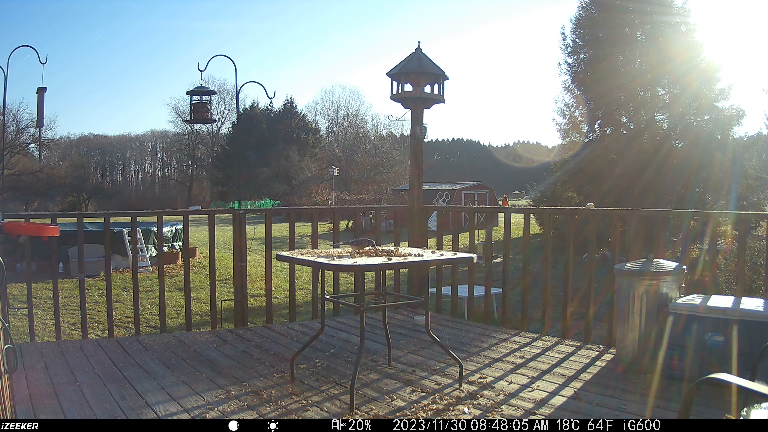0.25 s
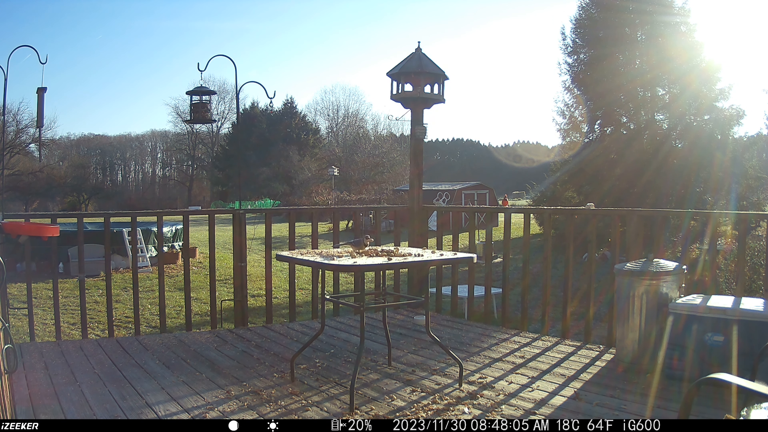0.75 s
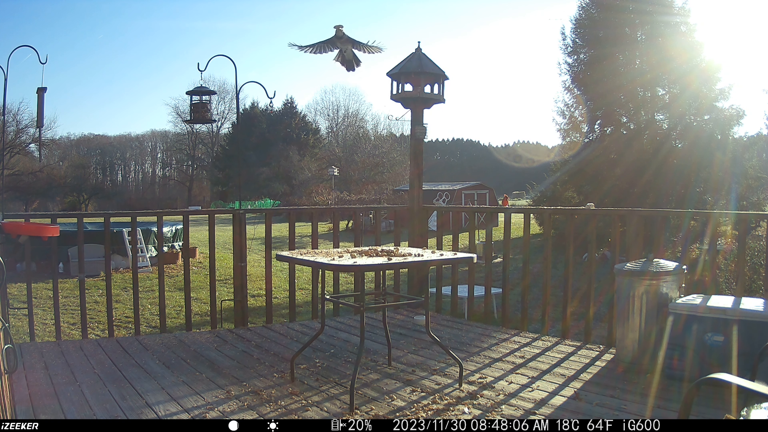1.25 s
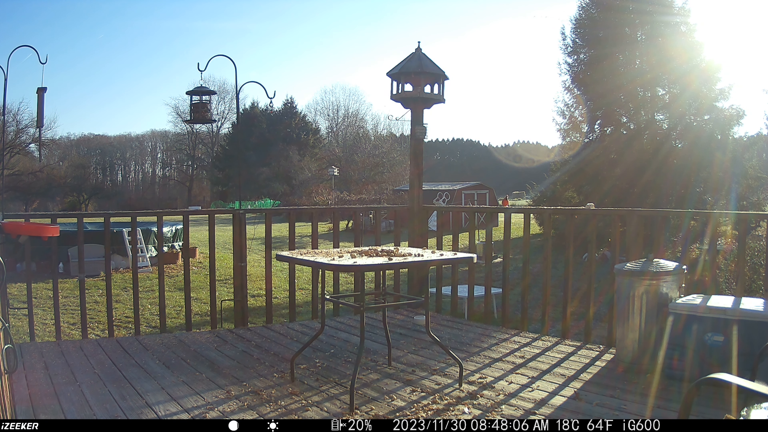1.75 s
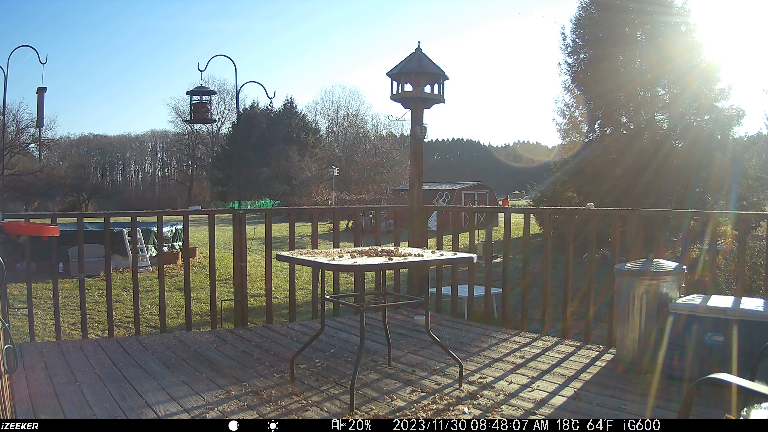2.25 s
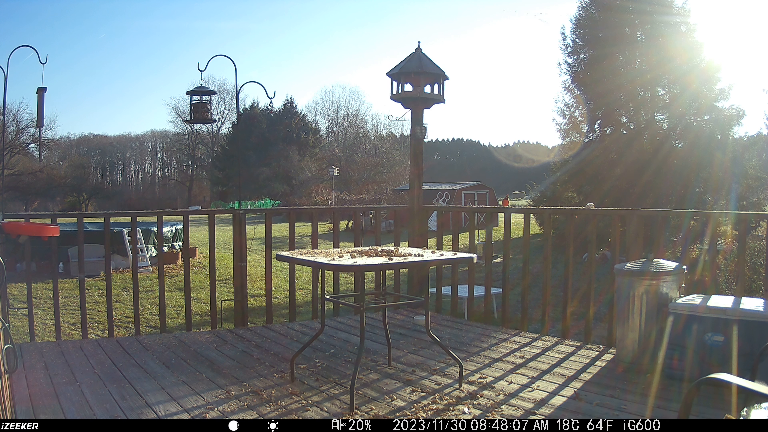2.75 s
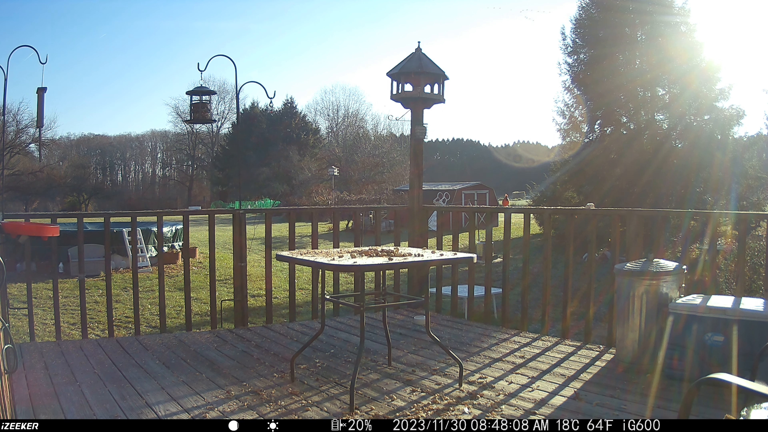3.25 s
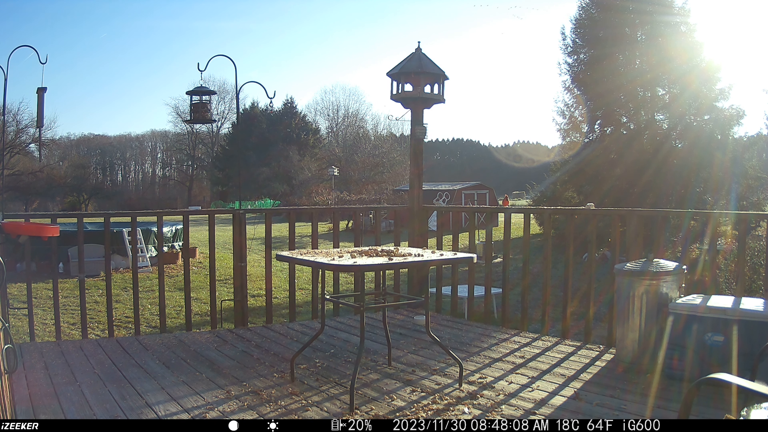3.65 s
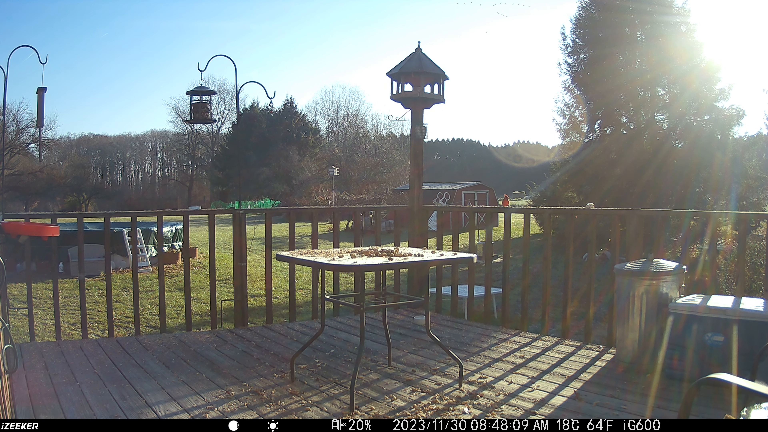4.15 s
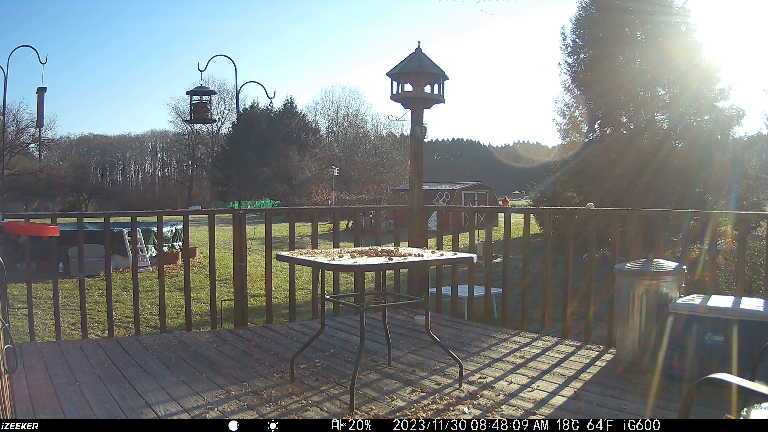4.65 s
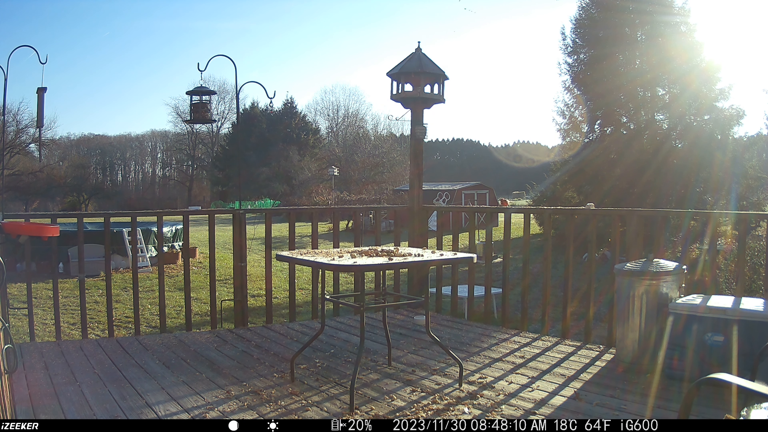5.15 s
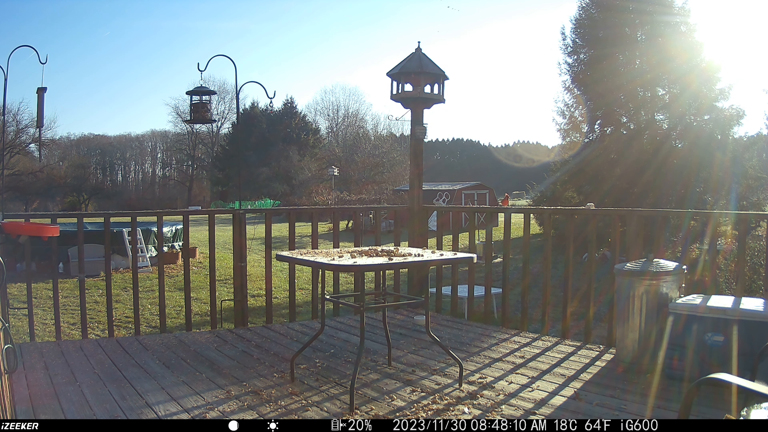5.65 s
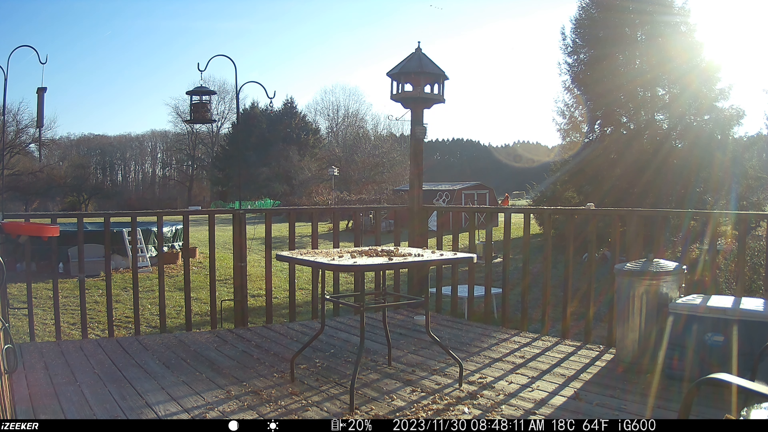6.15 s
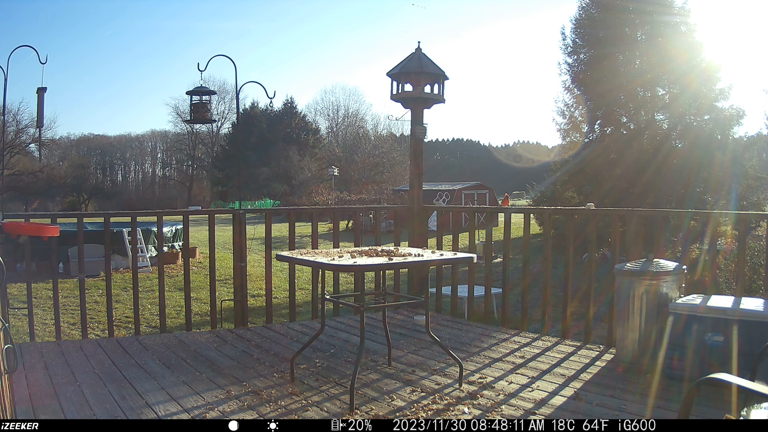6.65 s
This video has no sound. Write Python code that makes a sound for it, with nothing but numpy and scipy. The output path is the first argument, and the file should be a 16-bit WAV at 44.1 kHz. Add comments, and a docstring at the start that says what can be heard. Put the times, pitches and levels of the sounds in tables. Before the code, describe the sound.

Geese gabble faintly in the distance over quiet outdoor rumble, then a blue jay close by screams twice, loud, harsh and hoarse.

```python
"""Garden deck beside a house, trees beyond: a blue jay screams twice close to the microphone.
Each scream leaps up, sags and turns hoarse, built from partials, half-pitch lines and breath noise.
Farther off, a jay answers from the trees in partials and a flock of geese honks in reedy notes.
A small bird chips twice in two gliding tones; seed ticks and wingbeats at the feeders are shaped noise.
Wall and trees echo; the camera's noise suppressor lets the quiet outdoor rumble swell behind each scream."""
import sys
import numpy as np
from scipy import signal
from scipy.fft import rfft, irfft
from scipy.io import wavfile
from scipy.ndimage import uniform_filter1d

SR = 44100
rng = np.random.default_rng(int(sys.argv[2]) if len(sys.argv) > 2 else 0)


def waveform_to_disk(signal):
    """Save audio, clipped to [-1, 1], as 16-bit WAV at the path in sys.argv[1]."""
    frames = np.transpose(np.atleast_2d(signal))
    scaled = np.clip(frames, -1, 1) * 32767
    samples = np.round(scaled).astype(np.int16)
    wavfile.write(sys.argv[1], SR, samples)


N = 305172
TIME = np.arange(N) / SR
FREQS = np.arange(N // 2 + 1) * SR / N


def undb(db):
    """Decibels to gain."""
    return 10 ** (np.asarray(db) / 20)


def unit(x):
    """Scale to rms 1."""
    return x / np.sqrt(np.mean(x ** 2))


def response(hz, points):
    """Gain of a (Hz, dB) outline at these frequencies."""
    point_hz, point_db = np.transpose(points)
    return undb(np.interp(np.log(hz + 1), np.log(point_hz), point_db))


def noise(gain):
    """Noise of rms 1 with this gain over frequency."""
    spectrum = rfft(rng.standard_normal(N))
    return unit(irfft(spectrum * gain, N))


def band(hz, width_hz):
    """Noise of rms 1 in one resonance, 6 dB down at the edges of its width."""
    return noise(1 / (1 + (2 * (FREQS - hz) / width_hz) ** 2))


def wander(rate_hz, count):
    """Smooth random motion of spread about 1, moving at up to this rate."""
    sos = signal.butter(4, rate_hz, fs=SR, output="sos")
    # a quarter second of run-in lets the filter settle
    moving = signal.sosfilt(sos, rng.standard_normal(count + SR // 4))
    return unit(moving)[-count:]


def curves(rows):
    """Sample times and the columns of a table, joined by straight lines."""
    s, *columns = np.transpose(rows)
    t = np.arange(s[0], s[-1], 1 / SR)
    return [t] + [np.interp(t, s, column) for column in columns]


def add(out, start, x):
    """Mix a sound in at its start time in seconds."""
    i = max(int(start * SR), 0)
    out[i:i + len(x)] += x[:N - i]


def turn(hz):
    """Running phase of a pitch curve, in radians."""
    return 2 * np.pi * np.cumsum(hz) / SR


def tone(phase):
    """Sine of rms 1."""
    return np.sqrt(2) * np.sin(phase)


def scatter(x, t60, wet_db, dull_hz, build_s):
    """Sound thrown back by fence and trees: a dense tail that builds up, dies away and lacks treble."""
    t = TIME[:SR]
    tail = rng.standard_normal(SR) * undb(-60 * t / t60) * (1 - np.exp(-t / build_s))
    wet = signal.fftconvolve(x, tail / np.linalg.norm(tail))[:N]
    dull = signal.butter(2, dull_hz, fs=SR, output="sos")
    return undb(wet_db) * signal.sosfilt(dull, wet)


def outdoors(air_db=-64.5, drone_db=1.0):
    """Steady broadband air, with the low drone of distant machinery as narrow bands of noise."""
    # Outline of the air. Each row: frequency in Hz, relative density in dB per Hz.
    air_outline = [(13, -45), (22, 6.5), (53, -5), (76, -1.5), (203, -12), (333, -26), (475, -15),
                   (717, -15.5), (1020, -21), (1590, -20.5), (2210, -29.5), (11800, -34.5), (14300, -33.5),
                   (15500, -45.5)]
    # Machinery drone. Each row: centre in Hz, width in Hz, level in dB before the drone gain.
    drone_bands = [(59.5, 44, -66), (127.3, 17, -77.5), (283.7, 50, -78.5), (318.2, 17, -81.5),
                   (360, 30, -79.5), (417, 22, -81.5)]
    air = undb(air_db) * noise(response(FREQS, air_outline))
    drone = sum(undb(db) * band(hz, width_hz) for hz, width_hz, db in drone_bands)
    return air + undb(drone_db) * drone


def honk(length, pitch_hz, rise):
    """A reedy goose note of four partials, odd ones weaker; high notes arch, low ones run straighter."""
    # A goose's throat heard from afar. Each row: frequency in Hz, gain in dB.
    goose_throat = [(600, 1), (800, -1.5), (920, -1.5), (1250, 3.5), (1650, 2.5), (1850, -8), (2050, -8),
                    (2250, -21.5), (2600, -23), (3600, -43)]
    # Higher notes arch more. Each row: pitch in Hz, arch in octaves.
    arch_by_pitch = [(640, 0.018), (830, .1)]
    odd_db = -6  # first and third partials against the even ones
    u = np.linspace(-1, 1, int(length * SR))
    arch = np.interp(pitch_hz, *np.transpose(arch_by_pitch))
    octaves = rise * u / 2 - arch * u ** 2 + .004 * wander(250, len(u))
    hz = pitch_hz * 2 ** octaves
    phase = turn(hz)
    voice = 0
    for k in range(1, 5):
        voice = voice + response(k * hz, goose_throat) * undb(k % 2 * odd_db) * tone(k * phase)
    return voice * signal.windows.tukey(len(u), .4)


def geese(flock_db=-78.0, thinning_db=-5, count=220):
    """The nearest geese stand out of the flock's gabble, which slowly moves off; low gabble rises most."""
    # Nearest birds. Each row: start in seconds, length in seconds, pitch in Hz, rise in octaves,
    # level in dB before the throat's colour.
    honks = [(0.01, 0.073, 637, 0.089, -69.5), (0.056, 0.09, 719, 0.14, -65),
             (0.268, 0.09, 1027, 0.023, -73), (0.471, 0.057, 657, 0.13, -75),
             (0.515, 0.078, 856, 0.061, -76.5), (0.623, 0.08, 713, 0.077, -71),
             (0.684, 0.089, 1002, -0.16, -67.5), (0.688, 0.092, 912, -0.023, -66),
             (0.763, 0.072, 730, 0.052, -68), (0.805, 0.18, 617.6, 0.098, -68.5),
             (0.955, 0.089, 907, 0.18, -68), (1.188, 0.13, 686, 0.056, -73.5),
             (1.31, 0.073, 834, 0.163, -69), (1.315, 0.12, 720, 0.015, -73.5),
             (1.398, 0.13, 830.5, -0.055, -62), (1.615, 0.15, 927, 0.078, -68),
             (1.822, 0.058, 560, 0.15, -67.5), (1.896, 0.16, 601, 0.13, -66),
             (1.917, 0.086, 881, -0.066, -62.5), (2.108, 0.048, 740, -0.085, -68),
             (2.116, 0.085, 896, -0.1, -65), (2.343, 0.071, 648, 0.12, -67.5),
             (2.493, 0.063, 620, 0.073, -75), (2.809, 0.092, 930, 0.012, -63),
             (3.036, 0.12, 862, 0.077, -70), (3.07, 0.06, 755, 0.077, -70),
             (3.128, 0.048, 1030, -0.07, -70), (3.311, 0.09, 780, -0.052, -66),
             (3.404, 0.14, 596, 0.093, -73.5), (3.562, 0.076, 848, -0.03, -72.5),
             (3.735, 0.056, 997, -0.042, -73), (3.949, 0.12, 856, 0.16, -71.5),
             (4.057, 0.1, 918, -0.014, -62), (4.393, 0.084, 885.0, 0.03, -66),
             (4.655, 0.074, 690.0, 0.19, -69), (4.721, 0.06, 923, -0.15, -70),
             (4.959, 0.049, 626.0, 0.14, -68.5), (4.976, 0.075, 885.0, 0.0097, -60.5),
             (5.025, 0.061, 931, 0.0019, -63), (5.172, 0.13, 817, -0.13, -62.5),
             (5.653, 0.087, 643.5, 0.2, -65.5), (5.718, 0.05, 870, -0.12, -62.5),
             (5.826, 0.07, 795, -0.000012, -69), (5.864, 0.16, 585, 0.28, -65),
             (6.059, 0.15, 853.0, -0.13, -61), (6.142, 0.18, 583.3, 0.15, -63.0),
             (6.25, 0.06, 819, -0.11, -57), (6.286, 0.058, 907, -0.042, -58),
             (6.54, 0.083, 912, -0.054, -70.5), (6.691, 0.041, 834, -0.1, -76)]
    out = np.zeros(N)
    for start, length, hz, rise, db in honks:
        add(out, start, undb(db) * honk(length, hz, rise))
    for i, (offset, size, pitch) in enumerate(rng.random((count, 3))):
        when = (i + offset) / count  # share of the whole scene
        call = honk(.035 + .05 * size, 560 + 450 * pitch, .2 - .32 * pitch)
        add(out, when * N / SR, undb(flock_db + thinning_db * when) * call)
    return out


def far_jay(scoop=0.19, scoop_s=0.013, drop=0.054, drop_s=.012):
    """A jay in the trees: scoop up, ever hoarser sag and last drop in pitch; short notes are falling blips."""
    # Its calls. Each row: start in seconds, length in seconds, top pitch in Hz, end pitch in Hz,
    # level in dB before the throat's colour, first roughness, last roughness, half-pitch lines in dB.
    far_jeers = [(0.151, 0.23, 1992, 1846, -77.5, .3, 0.9, -7.5),
                 (2.266, 0.036, 1770, 1680, -82, .4, .7, -12),
                 (2.331, 0.25, 1976, 1825, -82, .17, 0.7, -4.5),
                 (2.756, 0.245, 1984, 1744, -80, 0.03, 0.7, -5),
                 (3.489, 0.04, 1795, 1700, -77.5, 0.4, .6, -17),
                 (3.592, 0.042, 1720, 1665, -82, .4, .6, -10),
                 (4.594, 0.24, 1886, 1737, -83.5, 1.04, 1.2, -4)]
    # Its beak, heard through the trees. Each row: frequency in Hz, gain in dB.
    far_beak = [(1900, -7), (2800, 1.5), (3700, 5), (4700, -5), (6700, -5.5), (7600, -16), (10000, -50)]
    out = np.zeros(N)
    for start, length, top_hz, end_hz, db, first_rough, last_rough, half_db in far_jeers:
        t = TIME[:int(length * SR)]
        hz = top_hz + (end_hz - top_hz) * t / length
        if length > 1 / 10:
            hz = hz * (1 - scoop * np.exp(-t / scoop_s) - drop * np.exp((t - length) / drop_s))
        rough = first_rough + (last_rough - first_rough) * (t / length) ** 2
        phase = turn(hz * (1 + .027 * rough * wander(400, len(t))))
        # lines at multiples of half the pitch: odd k falls between the partials
        for k in range(2, 10):
            # each line fades in and out on its way through the branches
            fading = undb(3.5 * wander(60, len(t)))
            line = response(k * hz / 2, far_beak) * undb(db + k % 2 * half_db) * tone(k * phase / 2)
            add(out, start, fading * line * signal.windows.tukey(len(t), .15))
    return out


def feeder(tick_s=0.00052, wing_db=-71, beat_hz=19, flight_s=1.34, flight_spread_s=0.64):
    """Dry ticks of beaks on seed as bursts of resonant noise; a small bird's wingbeats as pulsed noise."""
    # Beaks on seed. Each row: start in seconds, pitch in Hz, level in dB.
    ticks = [(.129, 6570, -62), (.148, 6700, -61), (.344, 8250, -66), (.404, 6300, -60),
             (5.579, 13900, -54), (5.893, 12200, -62)]
    out = np.zeros(N)
    t = TIME[:SR // 20]
    for start, hz, db in ticks:
        snap = t / tick_s * np.exp(1 - t / tick_s)  # peaks at tick_s
        add(out, start, undb(db) * snap * band(hz, 1400)[:len(t)])
    beat_phase = turn(beat_hz * (1 + .35 * wander(12, N)))
    beats = ((1 + np.cos(beat_phase)) / 2) ** 14
    flight = np.exp(-((TIME - flight_s) / flight_spread_s) ** 2)
    return out + undb(wing_db) * flight * beats * band(3800, 12000)


def chips():
    """One side of the small bird's syrinx dives and holds while the other flicks upward."""
    # The chips. Each row: start in seconds, level in dB before the shape's own levels.
    chip_rows = [(4.407, -52.5), (4.686, -57)]
    # Diving voice. Each row: seconds from start, pitch in Hz, relative level in dB.
    dive = [(0, 9870, -27), (.0025, 7380, -1), (.007, 6850, 3), (.012, 7200, -10), (.02, 7170, -27)]
    # Flicking second voice. Each row: seconds from start, pitch in Hz, relative level in dB.
    flick = [(.005, 7200, -2), (.008, 8500, -3), (0.012, 9800, -9), (.014, 10700, -23)]
    out = np.zeros(N)
    for start, db in chip_rows:
        for shape in (dive, flick):
            t, hz, shape_db = curves(shape)
            add(out, start + t[0], undb(db + shape_db) * tone(turn(hz)))
    return out


def jeer(row, pitch, ring, hoarse):
    """Controls of one scream: leap and sag, swell, flutter, split into a strong-weak beat, rasp, end."""
    scoop, scoop_s = 0.32, 0.011  # starts this share flat and leaps up to pitch
    attack_db, attack_s = -35.5, 0.0026  # the voice catches
    release_db, release_s = -24, 0.018  # the voice gives out
    half_start_db, half_split_db = -10.5, -6  # half-pitch lines before and after the split
    half_hoarse_db = -5  # they sink into the rasp at full roughness
    beat_ratio = 0.25  # before the split, cycles come early and late in groups of four
    growl_depth, growl_hz = 0.81, 165  # rattle of a hoarse voice: depth at full roughness, mean rate
    start, length, first_db, full_db, swell_s, split_s, flutter = row
    t = TIME[:int(length * SR)]
    hz, ring_db, rough = (np.interp(start + t, *np.transpose(curve)) for curve in (pitch, ring, hoarse))
    hz = hz * (1 - scoop * np.exp(-t / scoop_s))
    gate_db = attack_db * np.exp(-t / attack_s) + release_db * np.exp((t - length) / release_s)
    rest_db = gate_db + np.interp(t, [0, swell_s], [first_db, full_db])
    split = np.minimum(t / split_s, 1) ** 3
    half_db = half_start_db + (half_split_db - half_start_db) * split ** 2 + half_hoarse_db * rough
    sway = flutter * np.sin(np.pi * split) * np.sin(beat_ratio * turn(hz))
    growl = growl_depth * rough * np.sin(turn(growl_hz * (1 + .2 * wander(40, len(t)))))
    return t, hz, ring_db, gate_db, rest_db, half_db, rough, sway, growl


def near_jay(jitter=0.055, jitter_hz=550, ring_jitter=0.026, shimmer=0.42, rasp_db=3,
             shut_db=-80, whistle_db=7, opening_s=0.02, shut_hz=5300):
    """The syrinx beats strong-weak, adding half-pitch lines, then roughens; the throat follows partial two."""
    # The screams. Each row: start in seconds, length in seconds, first level in dB, full level in dB,
    # swell in seconds, time to split strong-weak in seconds, flutter depth in radians,
    # tilt in dB per octave. Levels are before the beak's colour.
    jeers = [(5.215, 0.34, -40, -29.5, 0.15, 0.117, 0.25, -2),
             (5.9721, 0.33, -33, -27, 0.11, 0.042, 0.03, 0.5)]
    # Sagging pitch, one list a scream. Each row: time in seconds, pitch in Hz.
    pitches = [
        [(5.25, 1884), (5.264, 1892), (5.34, 1767), (5.416, 1687), (5.54, 1500), (5.555, 1500)],
        [(6.005, 1840), (6.105, 1706), (6.179, 1634), (6.221, 1628), (6.277, 1527), (6.305, 1480)],
    ]
    # Ringing second partial, one list a scream. Each row: time in seconds, level in dB.
    rings = [
        [(5.216, -71), (5.244, -37.5), (5.26, -31.5), (5.324, -31), (5.406, -17.5), (5.432, -29),
         (5.444, -21.5), (5.464, -30.5), (5.528, -25.5), (5.562, -44)],
        [(5.974, -63.5), (6.001, -35), (6.017, -20), (6.033, -43.5), (6.043, -21.5), (6.109, -17),
         (6.131, -28.5), (6.179, -20), (6.283, -27.5), (6.312, -44)],
    ]
    # Hoarseness, one list a scream. Each row: time in seconds, roughness from 0 to 1.
    roughs = [
        [(5.225, .1), (5.275, .27), (5.3, .08), (5.335, .06), (5.365, .14), (5.415, .12), (5.465, .32),
         (5.525, .65)],
        [(6.03, .015), (6.105, .025), (6.155, .12), (6.215, .27), (6.27, .72)],
    ]
    # Throat and open beak. Each row: frequency in Hz, gain in dB.
    beak = [(850, -22.5), (1300, -13), (2500, -10), (3300, -5), (4300, -9), (4900, -5), (6000, -5),
            (7000, -5.5), (8500, -8), (10000, -19.5), (11800, -18.5), (13000, -33.5), (15500, -40.5)]
    # Outline of the hoarse rasp. Each row: frequency in Hz, relative density in dB per Hz.
    rasp_outline = [(100, -17.5), (380, -12.5), (780, 3.5), (1000, -18), (1400, 1), (2000, -4), (3000, -1),
                    (5500, -1), (8500, -12.5), (13000, -36.5)]
    fundamental_db = -41.5  # steady between the catch and the giving out, once the beak is open
    half_tilt_db = 4  # per octave: the half-pitch lines are weakest low down
    out = np.zeros(N)
    rasp = noise(response(FREQS, rasp_outline))
    for (*row, tilt_db), pitch, ring, hoarse in zip(jeers, pitches, rings, roughs):
        t, hz, ring_db, gate_db, rest_db, half_db, rough, sway, growl = jeer(row, pitch, ring, hoarse)
        steady = turn(hz) + sway
        slip = turn(hz * rough * wander(jitter_hz, len(t)))
        slip = slip - uniform_filter1d(slip, SR // 100)  # cycles come early and late around a firm pitch
        phase = steady + jitter * slip
        # the throat's ringing evens out the partial that it is tuned to
        voice = undb(ring_db) * tone(2 * (steady + ring_jitter * slip))
        # the beak starts nearly shut, ringing in one narrow band, and opens
        shut = np.exp(-(t / opening_s) ** 2)
        voice += undb(fundamental_db + gate_db) * (1 - shut) * tone(phase)
        # lines at multiples of half the pitch; each wavers by a few dB, the half-pitch lines most
        for k in range(1, 20):
            if k in (2, 4):  # partials one and two are already sounding
                continue
            line_hz = k * hz / 2
            odd = k % 2
            line_db = rest_db + odd * (half_db + half_tilt_db * np.log2(k / 7))
            line_db = line_db + tilt_db * np.log2(k / 6)
            line_db = line_db + shut * (whistle_db + shut_db * np.log2(line_hz / shut_hz) ** 2)
            line_db = line_db + (2 + 1.5 * odd) * wander(55, len(t))
            line = tone(k * phase / 2 + rng.uniform(0, 2 * np.pi))
            voice += response(line_hz, beak) * undb(line_db) * line
        voice *= 1 + growl + shimmer * rough * wander(780, len(t))
        # air rushes through once a cycle
        puffs = (1 + np.cos(phase)) / 2
        voice += undb(rest_db + rasp_db) * rough ** (3 / 2) * rasp[:len(t)] * puffs
        add(out, row[0], voice)
    return out


def lag(x, seconds):
    """One-pole smoothing with this time constant."""
    keep = np.exp(-1 / (seconds * SR))
    return signal.lfilter([1 - keep], [1, -keep], x)


def suppressor(front, background, threshold_db=-36, lift_db=14, listen_s=0.039, glide_s=0.012,
               bass_hz=90):
    """The camera's noise suppressor lets the background, save its deep bass, rise while all is loud."""
    power = lag((front + background) ** 2, listen_s)
    opened = lag(power / (power + undb(threshold_db) ** 2), glide_s)
    bass = lag(background, 1 / (2 * np.pi * bass_hz))
    return front + bass + undb(lift_db * opened) * (background - bass)


def scene():
    """Far birds washed in the tree line, near birds with short echoes; the background swells with screams."""
    # Colour of the near jay's echo from the tree line. Each row: frequency in Hz, gain in dB.
    tree_colour = [(1700, -6.5), (2900, 2), (3250, -4), (3500, 0), (3750, 9.5), (4500, -6), (9000, -25)]
    wall_s, wall_db = 0.0125, -6.5  # single echo from the house wall
    trees_s = 0.07  # delay before the tree line answers with a long, even wash
    flock, answer = geese(), far_jay()
    far = answer + scatter(answer, t60=0.79, wet_db=-6.0, dull_hz=6620, build_s=0.015)
    far = far + flock + scatter(flock, t60=0.55, wet_db=-8.0, dull_hz=4470, build_s=0.018)
    background = far + outdoors()

    small = chips()
    small = small + scatter(small, t60=0.1, wet_db=-3.0, dull_hz=12000, build_s=0.0041)

    near = near_jay()
    direct = near + undb(wall_db) * np.interp(TIME - wall_s, TIME, near)
    yard = scatter(near, t60=.26, wet_db=-19.5, dull_hz=14000, build_s=.008)
    trees = scatter(near, t60=0.68, wet_db=-39.5, dull_hz=6270, build_s=0.1)
    trees = irfft(rfft(trees) * response(FREQS, tree_colour), N)
    trees = np.interp(TIME - trees_s, TIME, trees)
    front = direct + yard + trees + small + feeder()
    return suppressor(front, background)[None]


def record(dry):
    """The camera cuts the top steeply above 15.7 kHz."""
    return signal.sosfilt(signal.ellip(10, .2, 80, 15700, fs=SR, output="sos"), dry)


dry = scene()
out = record(dry)
waveform_to_disk(out)
```